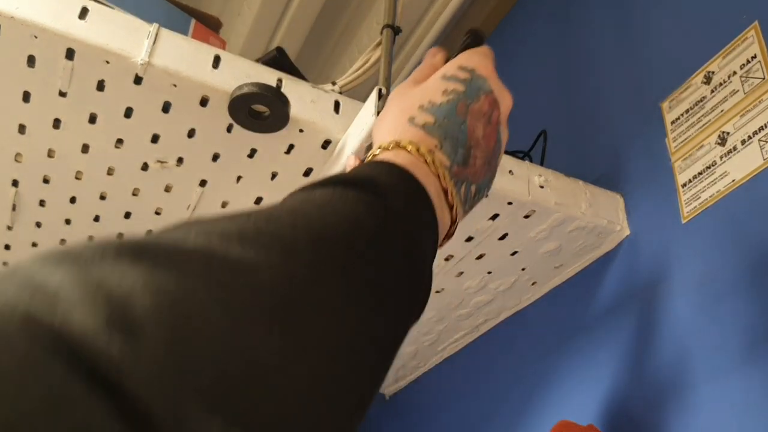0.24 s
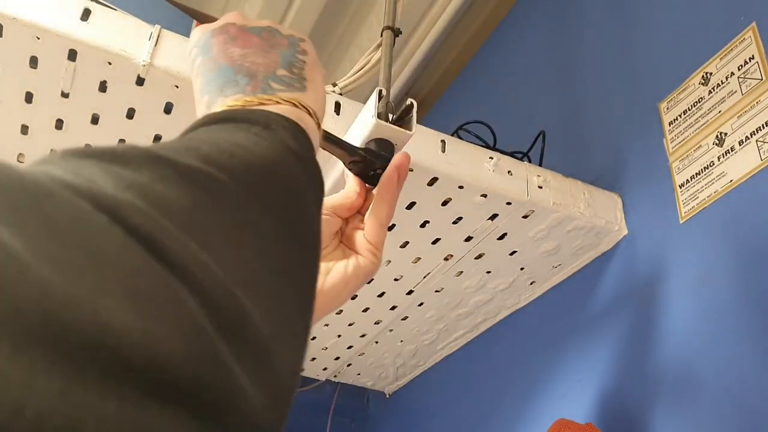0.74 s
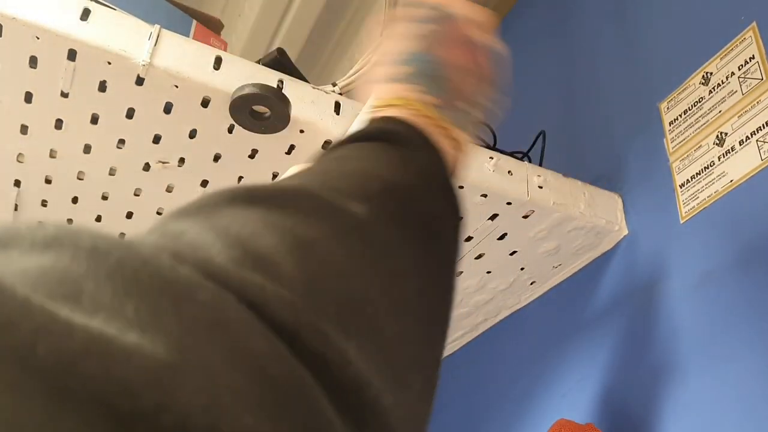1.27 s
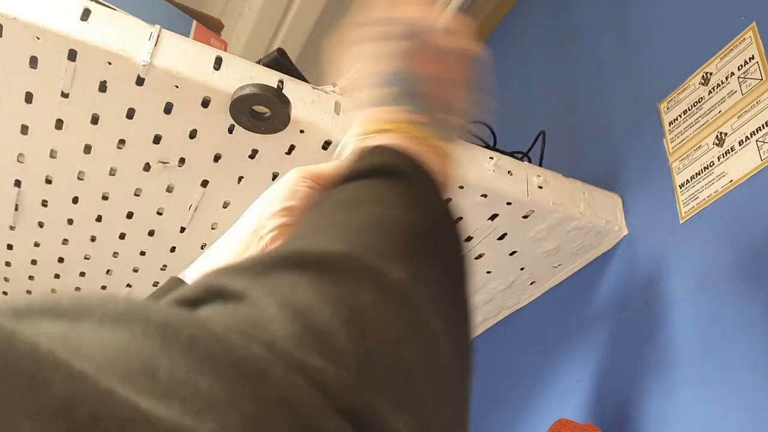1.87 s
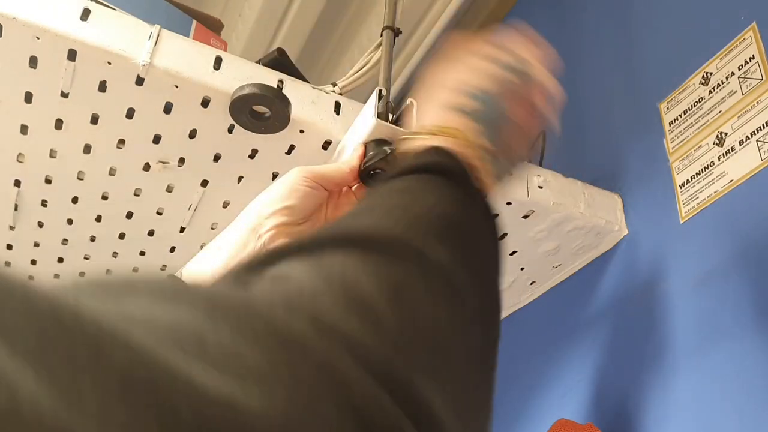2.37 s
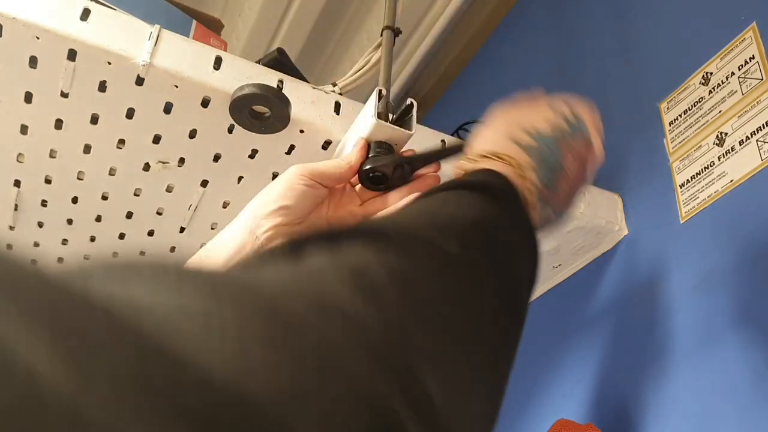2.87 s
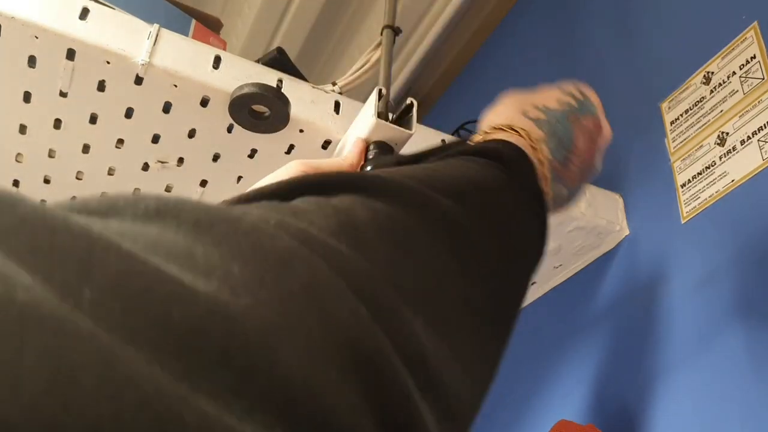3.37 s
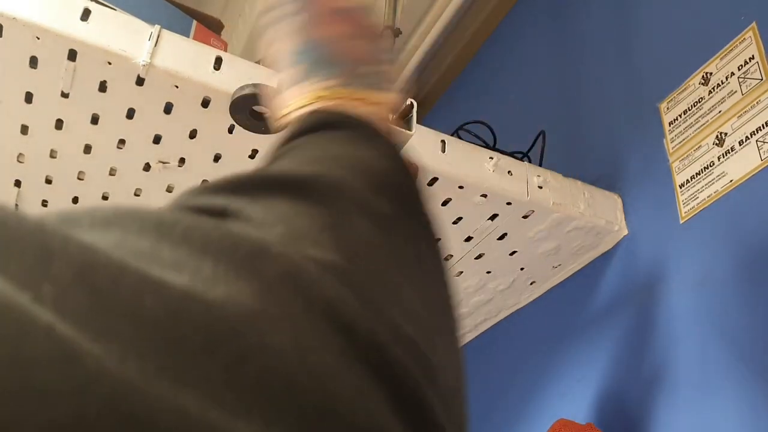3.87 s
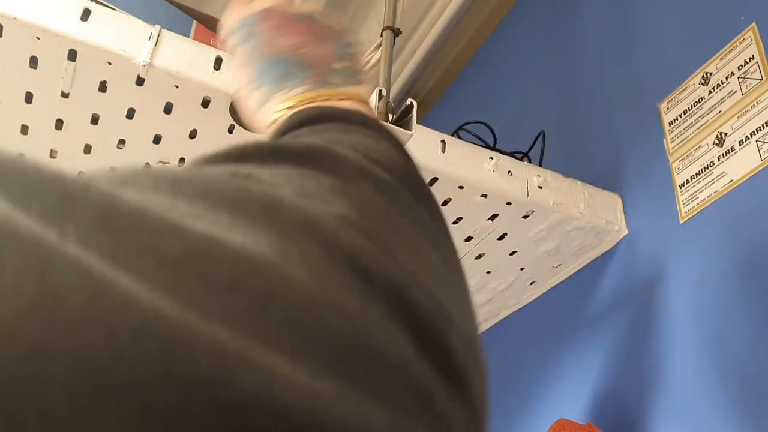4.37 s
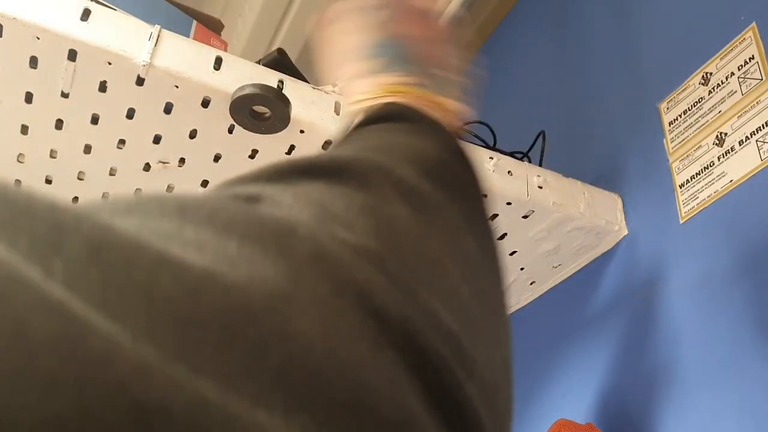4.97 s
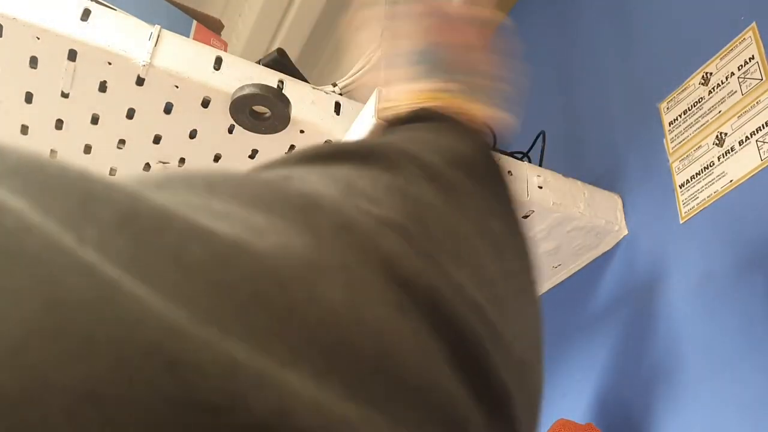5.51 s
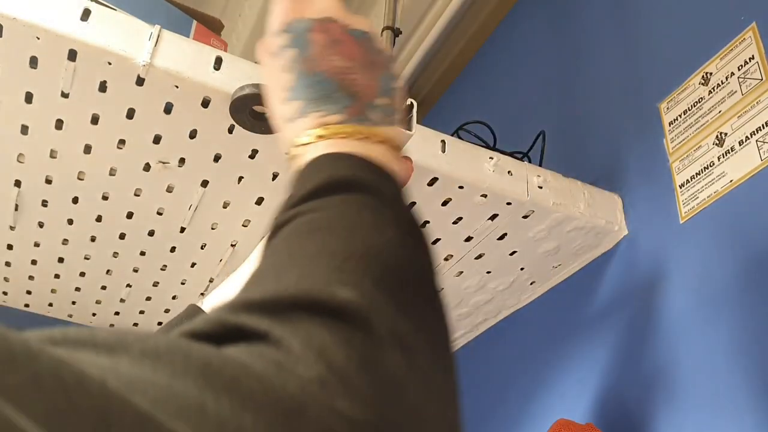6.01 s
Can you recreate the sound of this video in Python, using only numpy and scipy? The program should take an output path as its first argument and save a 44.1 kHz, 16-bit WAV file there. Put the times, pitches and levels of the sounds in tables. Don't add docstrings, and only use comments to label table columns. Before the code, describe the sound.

A ratchet wrench zips in short bright clicking bursts on each back-swing, with small metal knocks between, close up in a small room.

```python
import sys
import numpy as np
from scipy import signal
from scipy.fft import rfft, irfft, next_fast_len
from scipy.io import wavfile
from scipy.ndimage import uniform_filter1d, map_coordinates

SR = 44100
rng = np.random.default_rng(int(sys.argv[2]) if len(sys.argv) > 2 else 0)


def file_out(sig):
    cols = np.atleast_2d(sig).T
    lim = np.clip(cols, -1, 1)
    pcm = np.round(lim * 32767).astype(np.int16)
    wavfile.write(sys.argv[1], SR, pcm)


def attenuation_scalar(level_db):
    decades = np.asarray(level_db, float) / 20
    return 10 ** decades


N = 275625
CONTACT_LENGTH = 16384

# (t/s, shelf/dB, socket/dB, head/dB, chatter t60/s)
BITE_KNOCKS = [(1.884, -39, -35.5, -37.5, 0.021), (1.895, -34, -51, -67, 0.0028),
               (2.459, -35, -29, -32.5, 0.0067), (2.591, -51.5, -43, -68, 0.0044),
               (2.999, -39, -42, -66, 0.023), (3.623, -28, -29, -31.5, 0.0097),
               (3.759, -69, -73, -63.5, 0.0146), (4.249, -28, -30.5, -34, 0.057),
               (4.26, -37, -48, -28, 0.011), (4.7458, -24, -24.5, -34, 0.036),
               (5.289, -35, -39.5, -41, 0.045), (5.308, -32, -33.5, -32.5, 0.028),
               (5.828, -30.5, -37.5, -37, 0.021), (5.989, -62, -56, -52, 0.022)]


def ratchet():
    # (start t/s, tooth gaps, first gap/ms, gap at full speed/ms, gap as the hand slows/ms)
    swings = [
        (0.9701, 6, 11.3, 8.5, 11.3),
        (1.6301, 14, 13.7, 5.6, 13.5),
        (2.1967, 16, 10.9, 5.4, 16.3),
        (2.7668, 15, 9.9, 7.3, 15.8),
        (3.3486, 9, 10.4, 8.1, 12.6),
        (4.0023, 17, 15.7, 4.7, 15.8),
        (4.5547, 16, 12.6, 4.6, 10.8),
        (5.1158, 13, 8.9, 5.2, 10.7),
        (5.6316, 15, 7.9, 5.1, 15.2),
        (6.2083, 3, 10.2, 8.2, 9.2),
    ]
    stalls = [9.5, 28.2, 31.6, 31.2, 16.1, 20.4, 21.7, 18.6, 20, 7.9]
    # (socket/dB, head/dB, pawl/dB, growth over the swing/dB, last tooth/dB)
    force = [(-21, -23.5, -25.5, 6.5, 2.5), (-21.5, -23.5, -26, 3.5, 1), (-22.5, -25, -25, 2.5, 0),
             (-22.5, -24.5, -23, 5, 0.3), (-25.5, -21, -26, 4.5, 6), (-24, -22, -22, 6.5, -9),
             (-23.5, -22, -23.5, 3.5, -19), (-25, -22, -25.5, -0.5, 6.5), (-24, -20.5, -23, 3.2, -10),
             (-25.5, -24.5, -27.5, 0, 4.5)]
    # (level on the way/dB, share of the swing there, at the end/dB)
    grip = [(-36.5, 0.052, -34.5), (-31.5, 1, -41), (-44, 0.29, -36), (-37, 0.93, -39.5), (-42, 0.46, -36),
            (-28, 0.89, -49), (-31.5, 1, -57), (-35.5, 0.69, -31), (-34.5, 0.64, -38), (-31, 0.98, -37)]
    # (socket f/Hz, share of the swing, socket f/Hz after, pawl f/Hz)
    lean = [(3050, .7, 4400, 11100), (3500, .5, 4800, 11700), (3800, .7, 4500, 11700),
            (3400, .4, 4600, 11600), (4500, .35, 3100, 11700), (4800, .55, 4500, 10300),
            (4700, .65, 3200, 10800), (4300, .85, 4750, 10300), (3400, .5, 4500, 10500),
            (4400, .5, 4200, 11100)]
    grip_start_db = -45.5
    arch_db, scatter_db = 3, 2
    first_chatter_s, last_chatter_s = 0.015, 0.0066

    rows, shares, lean_hz = [], [], []
    for row, stall_ms, strength, shaking, favoured in zip(swings, stalls, force, grip, lean):
        *drop_db, growth_db, last_db = strength
        grip_db, peak_share, end_db = shaking
        early_hz, turn, late_hz, pawl_hz = favoured
        s = swing(*row, stall_ms)
        u = np.linspace(0, 1, len(s))
        effort_db = growth_db * (u - .5) - arch_db * (2 * u - 1) ** 2 + last_db * (u == 1)
        scatter = scatter_db * rng.standard_normal((len(s), len(drop_db)))
        level_db = np.add.outer(effort_db, drop_db) + scatter
        shelf_db = np.interp((s - s[0]) / np.ptp(s), [0, np.clip(peak_share, .05, .95), 1],
                             [grip_start_db, grip_db, end_db])
        socket_hz = np.where(u < turn, early_hz, late_hz)
        shares.append(u)
        lean_hz.append(np.column_stack([socket_hz, np.full(len(u), pawl_hz)]))
        rows.append(np.column_stack([s, shelf_db, level_db]))
    chatter_s = np.interp(np.concatenate(shares), [.5, 1], [first_chatter_s, last_chatter_s])[:, None]
    return contacts(np.concatenate(rows), np.concatenate(lean_hz), chatter_s,
                    rise_s=.0004, snap_db=1, ring_db=4.5, wet_db=8.0)


def swing(start_s, gaps, first_ms, fast_ms, late_ms, stall_ms):
    u = np.linspace(0, 1, gaps)
    early, late = (1 - u) ** 1.5, u ** 4
    gap_ms = first_ms ** early * fast_ms ** (1 - early - late) * late_ms ** late
    return start_s + np.cumsum([0, *gap_ms, stall_ms]) / 1000


def knocks():
    # (t/s, shelf/dB, socket/dB, head/dB, chatter t60/s)
    seating = [(0.026, -59, -50, -64, 0.17), (0.079, -57, -51.5, -54.5, 0.18), (0.158, -49, -42, -50, 0.06),
               (0.168, -42, -42.5, -51, 0.16), (0.25, -30, -22, -31.5, 0.032),
               (0.313, -34, -24, -25, 0.039), (0.337, -34.5, -26.5, -26.5, 0.044),
               (0.36, -19, -18.5, -18, 0.041), (0.4084, -9, -8.5, -6.5, 0.011),
               (0.704, -36.5, -32.5, -40, 0.0054), (1.2164, -32.5, -21.5, -16, 0.0069),
               (1.282, -34.5, -31.5, -32, 0.031), (1.48, -40.5, -37.5, -63, 0.012),
               (1.564, -61, -46.5, -66, 0.011), (1.592, -46, -66, -68, 0.0094)]
    # (t/s, shelf/dB, socket/dB, head/dB, chatter t60/s)
    slack = [(0.95, -47.5, -57, -56, 0.036), (1.611, -63, -53, -54, 0.013), (2.147, -56, -55, -50.5, 0.008),
             (2.162, -36, -29.5, -55, 0.0025), (2.737, -49.5, -43, -86.5, 0.017),
             (2.76, -54, -48, -48.5, 0.026), (3.284, -50.5, -57, -79, 0.023),
             (3.316, -43, -44.5, -72, 0.052), (3.338, -60, -55, -51, 0.043), (3.9, -44, -51, -75.5, 0.017),
             (3.934, -39, -42, -56.5, 0.077), (3.962, -52, -43, -56, 0.093), (4.491, -38, -39.5, -50, 0.01),
             (4.512, -49.5, -77, -63, 0.012), (4.526, -32, -39.5, -53, 0.048),
             (5.072, -49.5, -51, -70, 0.019), (5.087, -40.5, -53, -71, 0.033),
             (5.57, -29, -34.5, -79, 0.02), (5.596, -30.5, -37.5, -72, 0.02),
             (5.614, -34.5, -33.5, -38.5, 0.031), (6.152, -26, -27, -83, 0.0056)]
    pawl_under_head = [5.5, 10, 12]
    # (socket f/Hz, shelf f/Hz)
    knock_lean = [(4960, 1800), (4700, 640), (2850, 1230)]

    rows = []
    for kind, under_db in zip(map(np.array, [seating, slack, BITE_KNOCKS]), pawl_under_head):
        pawl_db = kind[:, -2] - under_db
        rows.append(np.column_stack([kind[:, :-1], pawl_db, kind[:, -1]]))
    rows = np.concatenate(rows)
    chatter_s = np.clip(rows[:, 5:], .004, .15)
    lean_hz = np.repeat(knock_lean, [len(seating), len(slack), len(BITE_KNOCKS)], axis=0)
    return attenuation_scalar(-8.0) * contacts(rows, lean_hz, chatter_s, rise_s=0.0027 + 0.058 * chatter_s,
                                snap_db=-11, ring_db=4, wet_db=10)


def contacts(table, lean_hz, chatter_s, rise_s, snap_db, ring_db, wet_db):
    # (f/Hz, width/Hz, level/dB)
    shelf = [(290, 50, 0), (520, 60, -5), (640, 45, 2), (800, 70, -8), (1045, 45, 3), (1250, 30, 1),
             (1420, 35, 6), (1800, 60, -5)]
    socket = [(2070, 90, -5), (2330, 140, -5), (2650, 120, -4), (3015, 70, 2), (3250, 150, -4),
              (3640, 170, 0), (3860, 130, -4), (4320, 120, -2), (4570, 130, -1), (4830, 100, -1),
              (5180, 130, -4)]
    head = [(5900, 200, -4), (6300, 250, -3), (6600, 200, -4), (7170, 160, -4), (8200, 300, -6),
            (8800, 300, -6)]
    pawl = [(10400, 300, 1), (11100, 400, -4), (11750, 300, 0), (14400, 350, -2), (14950, 350, 2)]
    # (f/Hz, width/Hz, level/dB)
    crack = [(1000, 1600, 0), (3700, 3600, 0), (6800, 3600, 0), (11000, 7500, 0)]
    radiation = [-28, -27.5, -28.5, -28.5]
    # (f/Hz, level/dB)
    room_colour = [(300, -6.5), (1500, -3.5), (5000, -9), (9000, -8.5), (15000, -8)]
    seat_width, seat_db = .22, 6

    t, f = np.arange(CONTACT_LENGTH) / SR, np.fft.rfftfreq(CONTACT_LENGTH, 1 / SR)
    snap = attenuation_scalar(snap_db - 60 * t / .0025)
    envelope = (attenuation_scalar(-60 * t / chatter_s) + snap) * (1 - np.exp(-t / rise_s))
    chatter = rfft(rng.standard_normal((len(table), CONTACT_LENGTH)) * envelope)
    seat = 8 + modes([(hz, seat_width * hz, seat_db) for hz in lean_hz[:, 0]], f)
    dry = wet = 0
    for k, part in enumerate([shelf, socket, head, pawl]):
        luck = uniform_filter1d(rng.standard_normal((len(table), len(part))), size=3, axis=0)
        turned_db = facing(table[:, 0], part) * (k > 0)
        struck = attenuation_scalar(ring_db + 5 * luck + turned_db + leaning(lean_hz, part))
        body = (1 + struck @ modes(part, f)) * modes(crack, f)[k] ** 3
        if part is socket:
            body = body * seat
        gain = attenuation_scalar(table[:, k + 1, None] + radiation[k]) * np.sqrt(chatter_s / .01)
        rung = chatter * body
        dry = dry + gain / spectrum_size(rung) * rung
        wet = wet + gain / spectrum_size(body) * body
    tails = rfft(room(len(table)), CONTACT_LENGTH)
    wet = irfft(wet * attenuation_scalar(wet_db + along(room_colour, f)) * tails)
    wet = wet * (1 - np.exp(-t / (0.00033 + 0.17 * chatter_s)))
    where = np.round(table[:, :1] * SR).astype(int) + np.arange(CONTACT_LENGTH)
    return np.bincount(where.ravel(), (irfft(dry) + wet).ravel(), N + CONTACT_LENGTH)[:N]


def spectrum_size(z):
    return np.linalg.norm(z, axis=1, keepdims=True) / CONTACT_LENGTH


def facing(s, part):
    # (t/s, boost/dB at each of facing_hz)
    pose = np.array([(1.001, 2.5, 0.96, -12, 1), (1.7, 3.5, 1.2, -8, -1.1), (2.299, -0.5, 0.31, 2.5, 1),
                     (2.83, -0.6, 0.38, -6, 6), (3.398, -0.5, 0.15, -3, 9), (4.079, 5, 0.55, -22, -23),
                     (4.63, 1.5, 1.3, 4, 11), (5.169, 7.5, 0.54, 2, 2), (5.699, 7, 0.82, -10.5, -4.5),
                     (6.22, 0, 0.092, -3, -18)])
    facing_hz = [3000, 4600, 11700, 15000]
    steady_hz = 6500
    boost = np.array([np.interp(s, pose[:, 0], c) for c in pose[:, 1:].T])
    mode_hz = np.array(part)[:, 0]
    share = []
    for only_one in np.eye(len(facing_hz)):
        points = sorted([*zip(facing_hz, only_one), (steady_hz, 0)])
        share.append(along(points, mode_hz))
    return boost.T @ np.array(share)


def leaning(lean_hz, part):
    octaves = np.log2(np.array(part)[:, 0] / lean_hz[:, :, None])
    return 6 * np.exp(-.5 * (octaves / .14) ** 2).sum(axis=1)


def room(count):
    # (f/Hz, t60/s)
    nearby = [(300, 0.39), (1000, 0.1), (2500, 0.11), (5500, 0.15), (9000, 0.088), (15000, 0.056)]
    noise = rng.standard_normal((count, CONTACT_LENGTH * 3 // 4))
    hz, t, z = signal.stft(noise, SR, nperseg=256)
    t60 = along(nearby, hz)[:, None]
    decay = attenuation_scalar(-60 * t / t60) + attenuation_scalar(-18.0 - 60 * t / (4.5 * t60))
    tail = signal.istft(z * decay, SR, nperseg=256)[1]
    tail = tail * np.cos(np.linspace(0, np.pi / 2, tail.shape[1])) ** 2
    return tail / np.linalg.norm(tail, axis=1, keepdims=True)


def shake(steel):
    effort = np.sqrt(np.abs(uniform_filter1d(steel ** 2, size=4000)))
    return attenuation_scalar(-32.5) * effort * hum(131, 1060)


def thuds():
    t60_s = 0.21
    s, shelf_db = np.transpose(BITE_KNOCKS)[:2]
    pushes = np.bincount(np.round(s * SR).astype(int), attenuation_scalar(shelf_db), N)
    push = signal.lfilter([1], [1, -attenuation_scalar(-60 / (t60_s * SR))], pushes)
    return attenuation_scalar(-22.5) * push * hum(248, 410)


def fan():
    # (f/Hz, level/dB per Hz)
    rush_colour = [(30, -25.5), (60, -16), (112, -20), (250, -25), (530, -17), (720, -21), (950, -24),
                   (1500, -22), (2300, -19.5), (2560, -35), (5300, -32), (7500, -42), (14800, -47.5),
                   (16500, -71)]
    # (f/Hz, width/Hz, level/dB)
    duct = [(295, 50, -16), (683, 30, -10), (730, 34, -6.5), (850, 30, -16), (1155, 20, -21),
            (2275, 90, -16)]
    # (t/s, level/dB)
    fan_level = [(0.0, -59.5), (0.42, -53), (0.499, -57), (3.919, -57.5), (4.12, -48), (4.3, -57.5),
                 (4.72, -54.5), (4.8, -57.5), (6.25, -58)]
    tones = 0
    for hz, width, level_db in duct:
        waver_db = 2.5 * wobble(5)
        tones = tones + attenuation_scalar(level_db + waver_db) * hum(hz, width)
    rush = attenuation_scalar(-3.5) * coloured(lambda f: attenuation_scalar(along(rush_colour, f)))
    s, db = np.transpose(fan_level)
    return attenuation_scalar(np.interp(np.arange(N) / SR, s, db)) * (rush + tones)


def wobble(rate):
    knots = rng.standard_normal(int(N * rate / SR) + 4)
    return map_coordinates(knots, [np.arange(N) * rate / SR])


def hum(hz, width):
    return coloured(lambda f: np.abs(modes([(hz, width, 0)], f)[0]) ** 2)


def coloured(gain):
    m = next_fast_len(N)
    spectrum = rfft(rng.standard_normal(m)) * gain(np.fft.rfftfreq(m, 1 / SR))
    return unit(irfft(spectrum, m)[:N])


def modes(table, f):
    hz, width, db = np.transpose(table)[:, :, None]
    return attenuation_scalar(db) * 1j * f * width / (hz * hz - f * f + 1j * f * width)


def along(points, hz):
    f, v = np.transpose(points)
    return np.interp(np.log(hz + 1), np.log(f + 1), v)


def unit(x):
    return x / np.sqrt(np.mean(x ** 2) + 1e-20)


def scene():
    steel = ratchet() + knocks()
    return (steel + shake(steel) + thuds() + fan())[None]


def top_cut(x):
    return signal.sosfilt(signal.butter(12, 16870, fs=SR, output="sos"), x)


def record(dry):
    f = np.fft.rfftfreq(N, 1 / SR)
    treble_edge = np.clip((15850 - f) / 200, .004, 1)
    bass_edge = 1 / (1 + (45 / (f + 1)) ** 4)
    soft = dry / (1 + np.abs(dry / .45) ** 4) ** .25
    return top_cut(irfft(rfft(soft) * treble_edge * bass_edge, N))


dry = scene()
out = record(dry)
file_out(out)
```